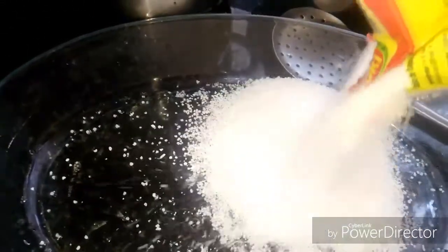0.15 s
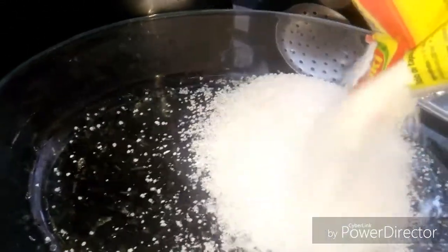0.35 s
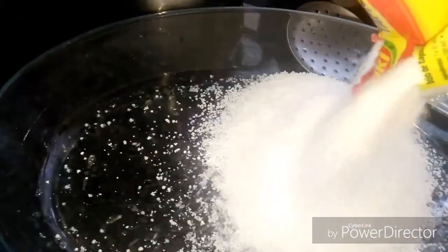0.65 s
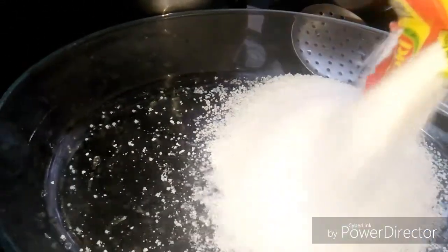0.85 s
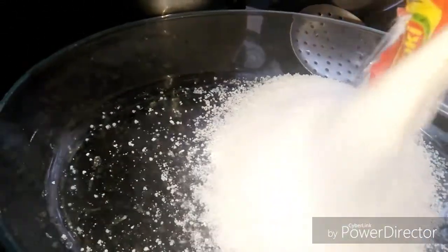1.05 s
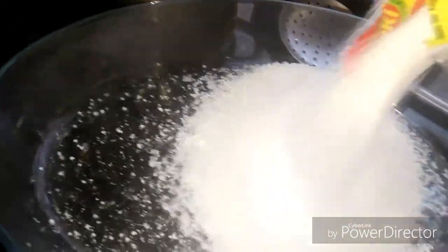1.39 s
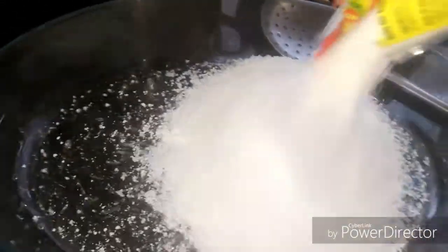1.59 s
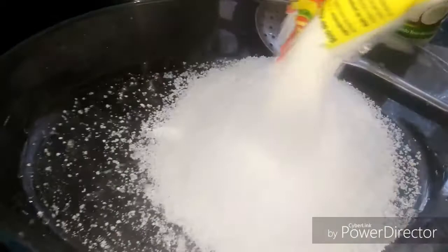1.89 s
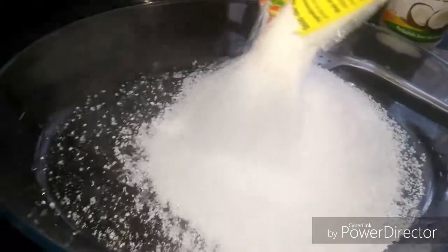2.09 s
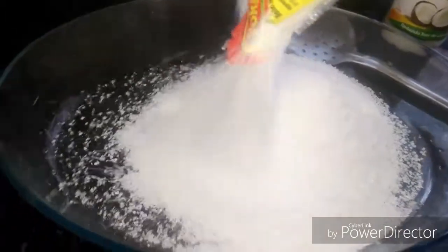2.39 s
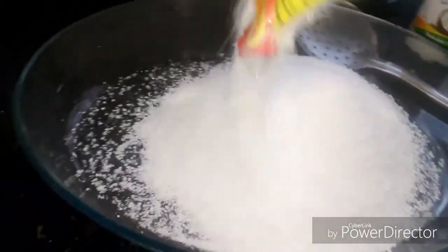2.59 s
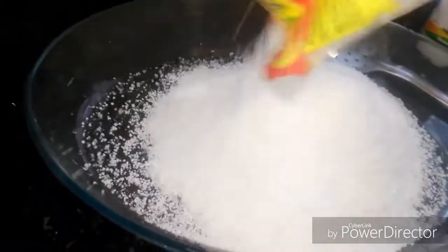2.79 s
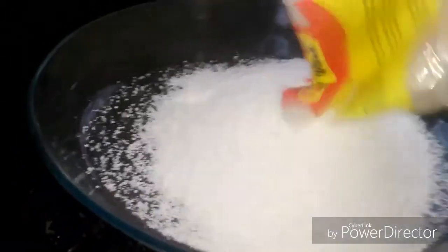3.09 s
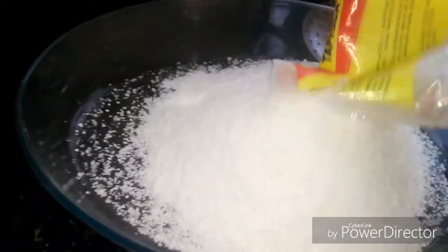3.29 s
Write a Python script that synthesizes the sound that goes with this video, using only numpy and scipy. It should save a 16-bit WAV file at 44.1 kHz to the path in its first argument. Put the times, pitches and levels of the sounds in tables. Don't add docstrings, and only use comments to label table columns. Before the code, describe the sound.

Dry granules pour steadily from a plastic packet onto a heap, hissing, then shaken out in spurts

```python
import sys
import numpy as np
from scipy import signal
from scipy.fft import rfft, irfft
from scipy.io import wavfile
from scipy.ndimage import uniform_filter1d, map_coordinates

SR = 44100
rng = np.random.default_rng(int(sys.argv[2]) if len(sys.argv) > 2 else 0)


def to_linear_factor(level_db):
    exponent = np.asarray(level_db, float) / 20
    return 10 ** exponent


def persist_wave(psi):
    counts = np.round(np.clip(psi, -1, 1) * 32767).astype(np.int16)
    wavfile.write(sys.argv[1], SR, np.atleast_2d(counts).T)


N = 152145


def evened(x):
    return x / np.sqrt(np.mean(x ** 2) + 1e-20)


def read(points, hz):
    point_hz, point_db = np.transpose(points)
    return np.interp(np.log(hz + 1), np.log(point_hz + 1), point_db)


def lift(hz, centre_hz, width_hz, lift_db):
    return lift_db / (1 + (2 * (hz - centre_hz) / width_hz) ** 2)


def coloured(x, db_at):
    hz = abs(np.fft.fftfreq(8192, 1 / SR))
    log_gain = np.log(to_linear_factor(np.maximum(db_at(hz), -100)))
    taps = np.fft.ifft(np.exp(np.conj(signal.hilbert(log_gain)))).real[:4096]
    return signal.oaconvolve(x, taps)[:N]


def swell(at_s, peak_db, length_s):
    t = np.arange(N) / SR
    return to_linear_factor(peak_db) * np.exp(-(2 * (t - at_s) / length_s) ** 2)


def kitchen():
    # freq_hz, density_db (per Hz)
    rumble_spectrum = [(15, -47), (35, -7.5), (62, 2), (95, -13), (290, -13.5), (430, -22), (800, -32),
                       (1500, -64)]
    # at_s, level_db, length_s, pitch_hz
    handling = [(0.403, -62, 1, 397), (1.243, -70, 0.6, 89.5), (1.544, -65, 0.33, 191),
                (1.998, -57, 0.051, 64.5), (2.115, -69.5, 0.12, 293), (2.678, -57, 0.04, 71.4),
                (2.887, -73, 0.032, 345), (3.053, -65, 0.16, 110), (3.21, -61, 0.15, 410),
                (3.275, -57.5, 0.054, 258), (3.37, -56, 0.1, 293), (3.43, -63, 0.09, 70.6)]
    rumble_db, half_band = -67.5, 0.31
    rumble, rub = rng.standard_normal((N, 2)).T
    out = to_linear_factor(rumble_db) * evened(coloured(rumble, lambda hz: read(rumble_spectrum, hz)))
    for at_s, level_db, length_s, pitch_hz in handling:
        edges_hz = pitch_hz * np.exp([-half_band, half_band])
        band = signal.butter(2, edges_hz, "band", fs=SR, output="sos")
        out = out + swell(at_s, level_db, length_s) * evened(signal.sosfilt(band, rub))
    return out


def echo(x):
    t60_s, gap_s = 0.04, 0.001
    t = np.arange(8000) / SR
    tail = rng.standard_normal(8000) * to_linear_factor(-60 * t / t60_s) * (t > gap_s)
    return signal.oaconvolve(x, tail / np.linalg.norm(tail))[:N]


def snaps():
    # at_s, peak_db, pitch_hz
    buckles = [
        (.199, -25, 990),
        (.779, -27, 1010),
        (1.01, -59.5, 920),
        (3.147, -42, 1390),
        (3.193, -30, 1490),
        (3.329, -33, 1500),
        (3.333, -27.5, 1460),
    ]
    # ratio (multiple of pitch), level_db, t60_s
    film_modes = [(1, 5.5, .010), (1.4, 8, 0.0055), (2.1, -4.5, 0.0062), (2.6, -4, .005), (3.2, -3, .004)]
    rise_s, floor_hz = 0.0003, 820
    out, t = np.zeros(N + 2000), np.arange(2000) / SR
    for at_s, peak_db, pitch_hz in buckles:
        ring = np.zeros(2000)
        for ratio, level_db, t60_s in film_modes:
            ring += to_linear_factor(level_db - 60 * t / t60_s) * np.sin(2 * np.pi * ratio * pitch_hz * t)
        ring *= np.minimum(t / rise_s, 1)
        start = round(at_s * SR)
        out[start:start + 2000] += to_linear_factor(peak_db) * ring / abs(ring).max()
    return signal.sosfilt(signal.butter(4, floor_hz, "high", fs=SR, output="sos"), out[:N])


def ticks(per_s, spread_db):
    clump_s, clump_db = 0.0029, 0.76
    draw, size, sign, clump = rng.random((N, 4)).T
    clump_n = int(clump_s * SR)
    clump = evened(uniform_filter1d(uniform_filter1d(clump - 0.5, clump_n), clump_n))
    size_db = spread_db * np.minimum(-np.log(size + 1e-9), 5) + clump_db * clump
    return (draw < per_s / SR) * np.sign(sign - 0.5) * to_linear_factor(size_db)


def crinkles():
    # at_s, level_db, length_s
    creases = [(2.844, -57, 0.092), (2.9, -55, 0.09), (3.125, -50, 0.044), (3.209, -46, 0.052),
               (3.29, -51, 0.061), (3.35, -47.5, 0.048), (3.387, -42, 0.023), (3.431, -50, 0.047)]
    # freq_hz, density_db (per Hz)
    film_spectrum = [(300, -22), (750, -16), (1100, -10.5), (1550, -1), (2300, -13.5), (3300, -7),
                     (4000, -26), (12000, -43)]
    crackle = coloured(ticks(per_s=3000, spread_db=2), lambda hz: read(film_spectrum, hz))
    return evened(crackle) * sum(swell(*row) for row in creases)


def motion():
    # at_s, stream_db, rattle_db (relative to stream)
    pour = [
        (0, -37.5, -44),
        (.1, -35, -29),
        (.7, -33, -11),
        (1.6, -34, -9),
        (2.05, -35.5, -11),
        (2.52, -36, -6),
        (2.58, -40.5, -5),
        (2.719, -41.5, -1.5),
        (2.76, -55, 4),
    ]
    # at_s, peak_db, fall_db_per_s
    shakes = [(2.81, -54, 118), (2.876, -39, 270), (2.967, -37.5, 90), (3.034, -32, 150), (3.09, -43, 350),
              (3.149, -28.5, 144), (3.218, -40, 400), (3.282, -40, 145), (3.31, -41.5, 220),
              (3.36, -47.5, 293), (3.389, -43, 600), (3.435, -54.5, 200)]
    shake_rises = [150, 100, 1000, 260, 300, 800, 250, 1500, 250, 300, 900, 300]
    shake_landing_db, trickle_db, cutoff_db_per_s = -8.5, -78, 300
    t = np.arange(N) / SR
    s, db, share_db = np.transpose(pour)
    stream_db = np.interp(t, s, db) - cutoff_db_per_s * np.maximum(t - s[-1], 0)
    spurt_power = to_linear_factor(trickle_db) ** 2 * (t > s[-1])
    for (at_s, peak_db, fall), rise in zip(shakes, shake_rises):
        drop_db = np.where(t < at_s, rise * (at_s - t), fall * (t - at_s))
        spurt_power = spurt_power + to_linear_factor(peak_db - drop_db) ** 2
    landing_power = to_linear_factor(stream_db) ** 2 + spurt_power * to_linear_factor(shake_landing_db) ** 2
    inside_power = to_linear_factor(stream_db + np.interp(t, s, share_db)) ** 2 + spurt_power
    return np.sqrt(landing_power), np.sqrt(inside_power)


def mirrored(x, notch_hz):
    mirror_gain, mirror_top_hz = 0.68, 7000
    late = map_coordinates(x, [np.arange(N) - SR / notch_hz], order=3)
    return x - mirror_gain * signal.filtfilt(*signal.butter(2, mirror_top_hz, fs=SR), late)


def granules():
    # freq_hz, density_db (per Hz)
    open_spectrum = [(150, -48.5), (250, -29.5), (453, -25.5), (575, -28), (909, -17.5), (3200, -9.5),
                     (5790, 1), (8420, -17), (14500, -26.5)]
    tall_spectrum = [(150, -53), (760, -38.5), (900, -23), (2000, -17.5), (3600, -8.5), (6200, 1),
                     (7200, -12), (14500, -29.5)]
    rattle_spectrum = [(150, -35), (250, -31.5), (528, -23.5), (879, -26), (1150, -19.5), (2310, -4.5),
                       (4060, -4), (5410, 1), (14500, -21)]
    # centre_hz, width_hz, lift_db
    dish_modes = [(910, 400, 4.5), (2080, 700, 4), (2470, 290, -7.5), (2990, 200, 3), (3270, 200, -5.5),
                  (3430, 160, 3), (4640, 100, 8), (4620, 170, -7.5)]
    hollow_modes = [(522, 42, 17.5), (955, 190, 17), (1090, 41, 13.5), (1280, 33, -19), (1500, 630, 12.5),
                    (1950, 330, -6), (2370, 500, 9), (3210, 720, 5), (4200, 190, 0.5), (4500, 660, 6.5),
                    (5670, 700, 6)]
    # at_s, upright_share (0-1), notch_hz (first notch of the mirror)
    tilt = [
        (0, 0.14, 1500),
        (1, 0, 1440),
        (1.7, 0.08, 1500),
        (1.95, 0.82, 1680),
        (2.25, 0.9, 1766),
        (2.5, 0.95, 1990),
        (2.8, 0.5, 1900),
    ]
    landing, inside = motion()
    t = np.arange(N) / SR
    s, share, notch = np.transpose(tilt)
    upright, notch_hz = np.interp(t, s, share), np.interp(t, s, notch)

    open_heap = coloured(ticks(per_s=14000, spread_db=2),
                         lambda hz: read(open_spectrum, hz) + sum(lift(hz, *row) for row in dish_modes))
    tall_heap = coloured(ticks(per_s=14000, spread_db=2), lambda hz: read(tall_spectrum, hz))
    tall_heap = mirrored(tall_heap, notch_hz)
    rattle = coloured(ticks(per_s=9000, spread_db=2),
                      lambda hz: read(rattle_spectrum, hz) + sum(lift(hz, *row) for row in hollow_modes))
    heap = np.sqrt(1 - upright) * evened(open_heap) + np.sqrt(upright) * evened(tall_heap)
    return landing * heap + inside * evened(rattle)


def scene():
    echo_db = -17
    near = granules() + crinkles() + snaps()
    return np.tile(near + to_linear_factor(echo_db) * echo(near) + kitchen(), (2, 1))


def band_limit(x):
    return signal.sosfilt(signal.butter(12, 15180, fs=SR, output="sos"), x)


def record(dry):
    # at_s, low_hz, high_hz, level_db
    splits = [
        (.4256, 4240, 5180, -42),
        (0.702, 5150, 6340, -38),
        (.7042, 9600, 11800, -56),
        (2.0742, 8200, 10500, -52.5),
        (2.2135, 8800, 10500, -57),
    ]
    edge_hz, split_s = 14310, 0.034
    t, hz = np.arange(N) / SR, np.fft.rfftfreq(N, 1 / SR)
    heard = coloured(dry[0], lambda f: lift(f, centre_hz=5650, width_hz=600, lift_db=2))
    heard = irfft(rfft(heard) * (hz < edge_hz), N)
    side = np.zeros(N)
    noise = rfft(rng.standard_normal(N))
    for at_s, low_hz, high_hz, level_db in splits:
        gate = np.cos(np.pi * np.clip((t - at_s) / split_s, -0.5, 0.5))
        band = irfft(noise * (hz > low_hz) * (hz < high_hz), N)
        side = side + to_linear_factor(level_db) * gate * evened(band)
    return band_limit(np.array([heard + side, heard - side]))


dry = scene()
out = record(dry)
persist_wave(out)
```